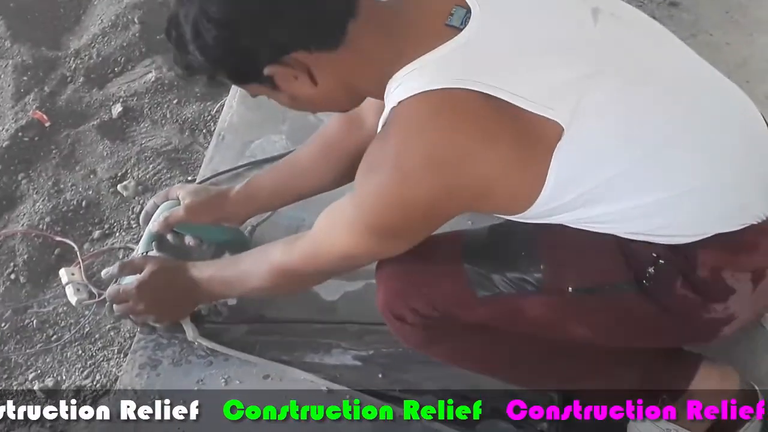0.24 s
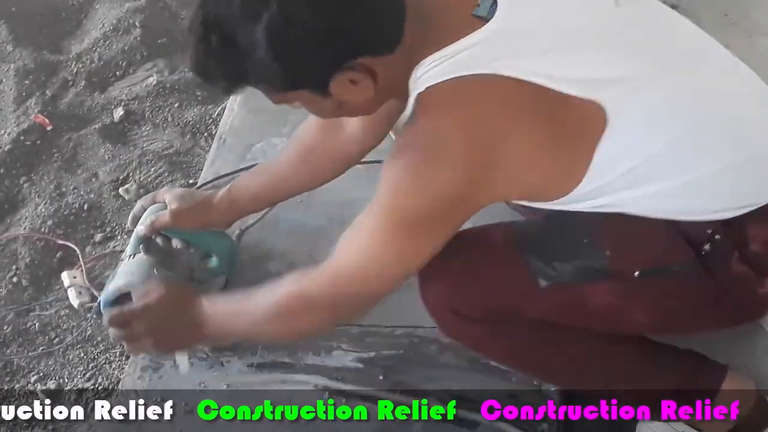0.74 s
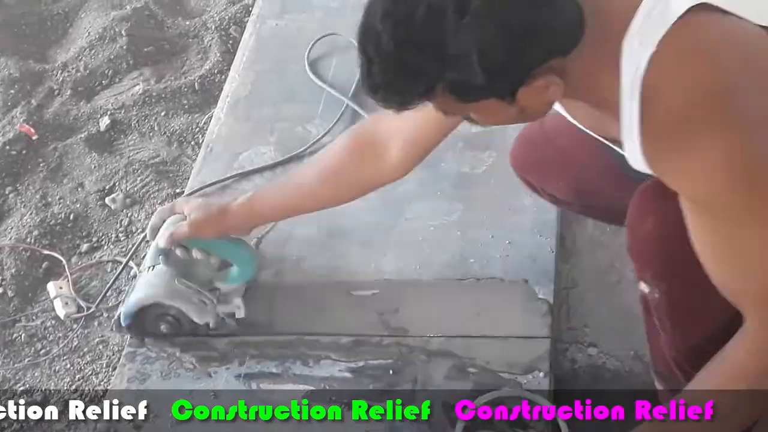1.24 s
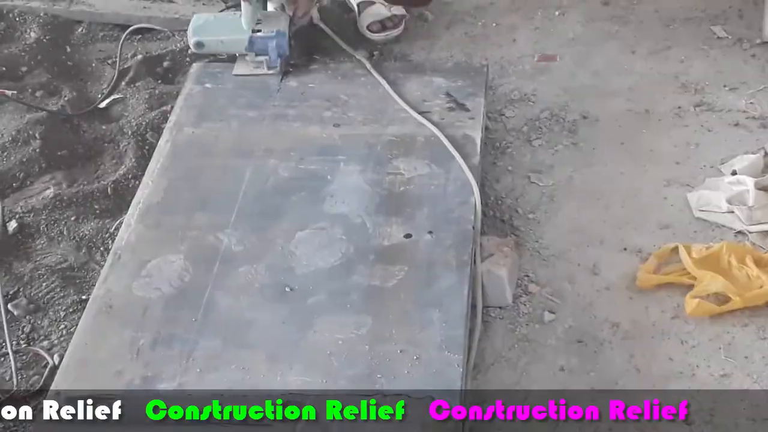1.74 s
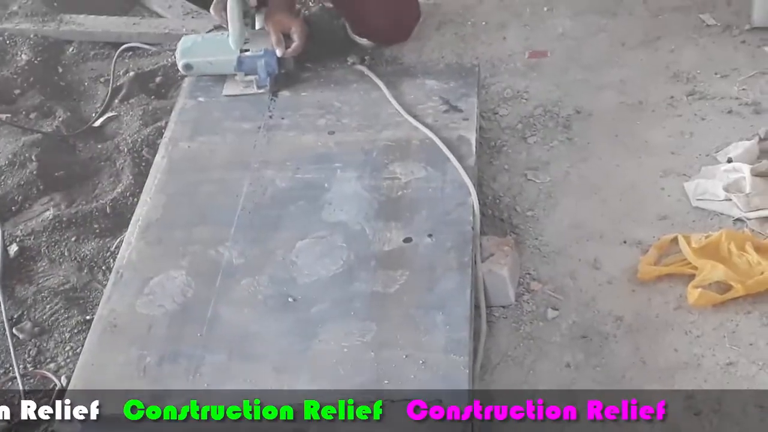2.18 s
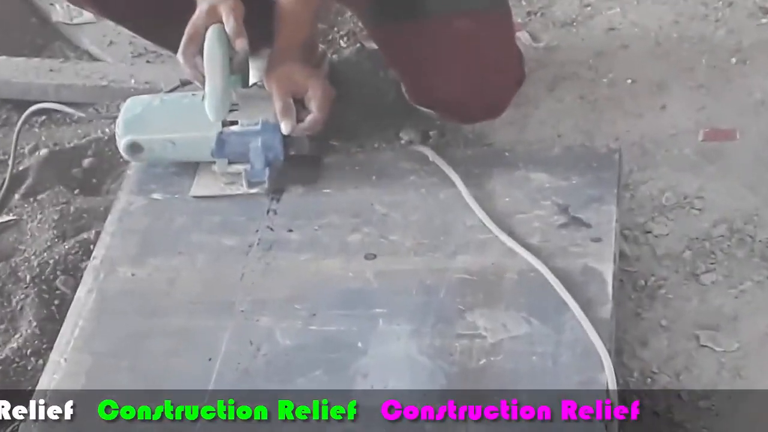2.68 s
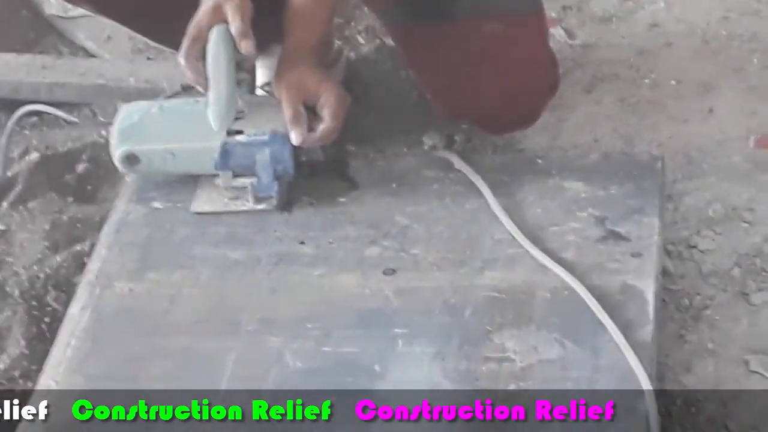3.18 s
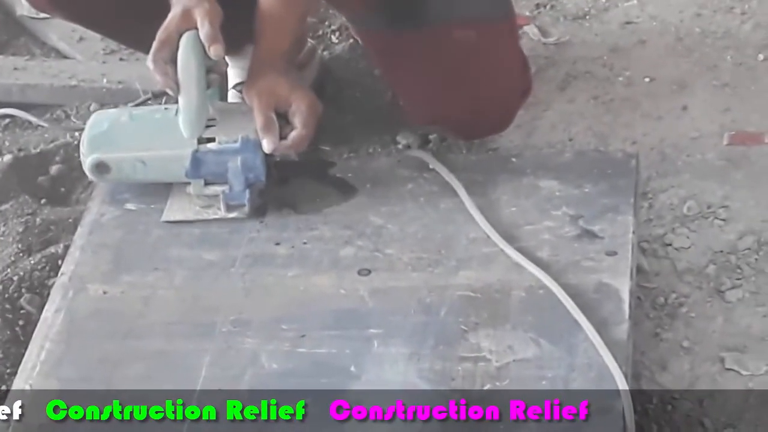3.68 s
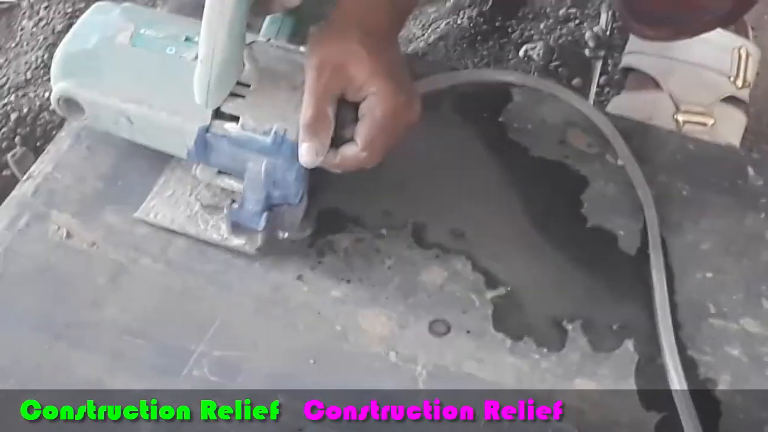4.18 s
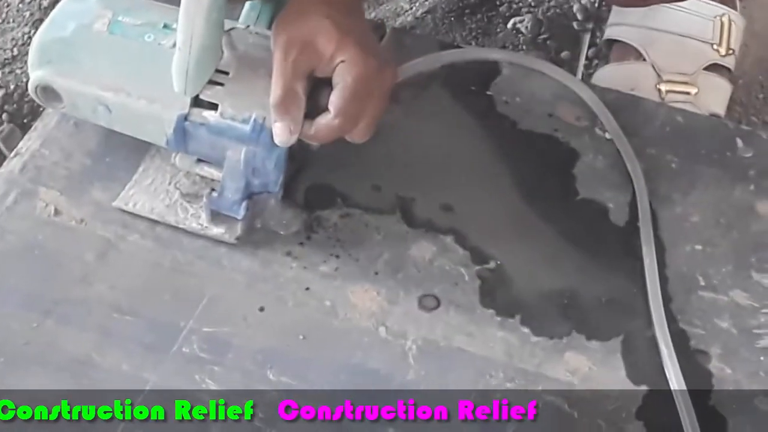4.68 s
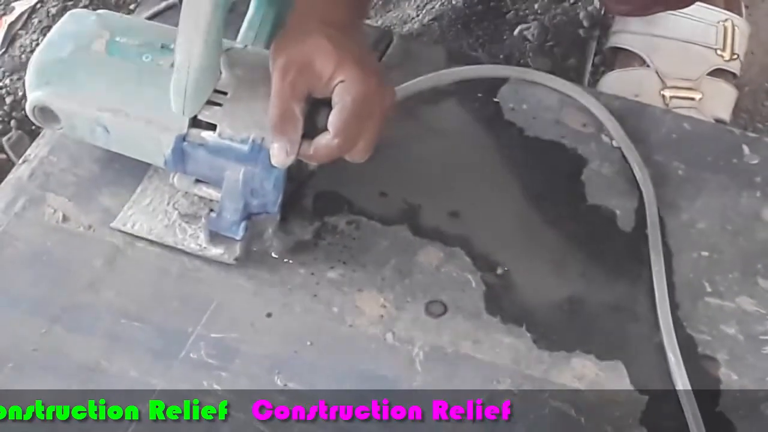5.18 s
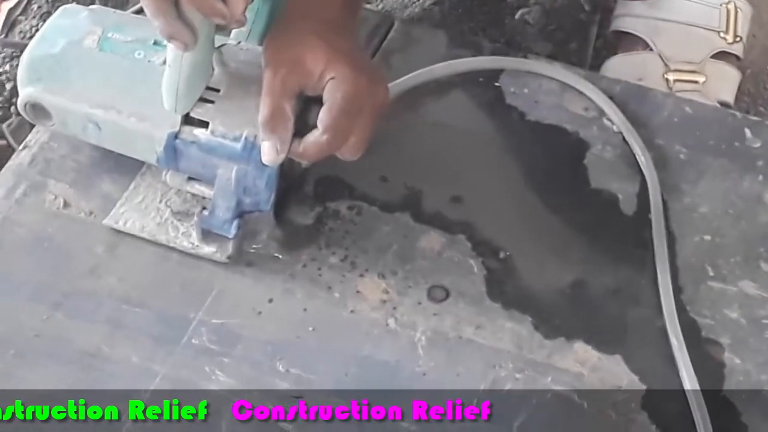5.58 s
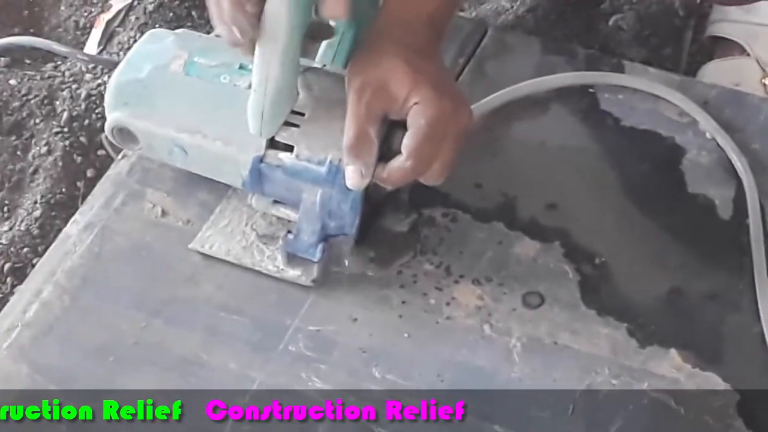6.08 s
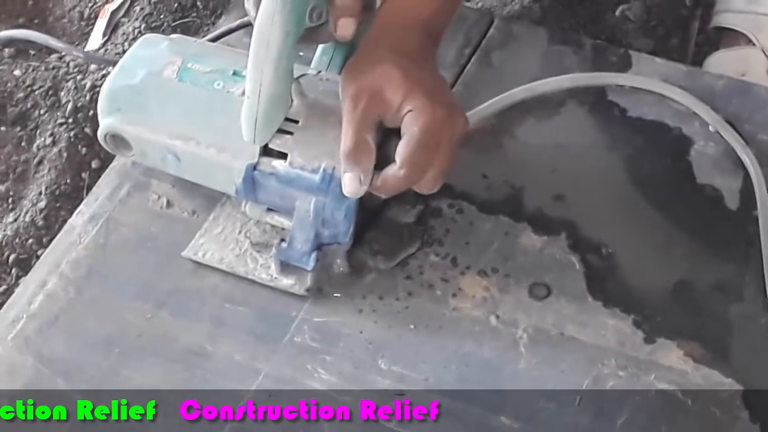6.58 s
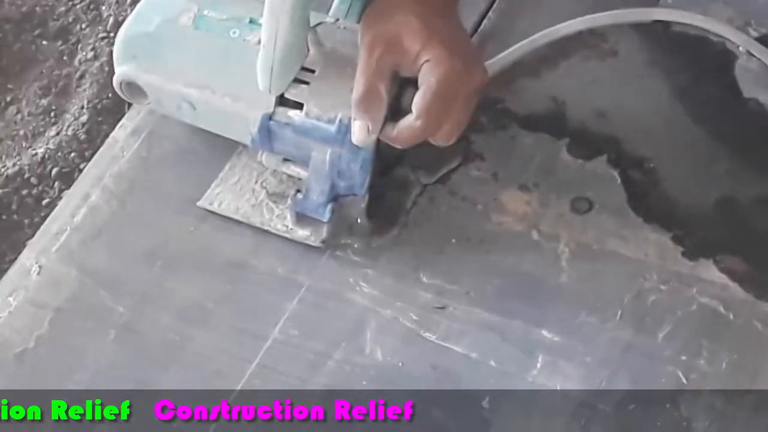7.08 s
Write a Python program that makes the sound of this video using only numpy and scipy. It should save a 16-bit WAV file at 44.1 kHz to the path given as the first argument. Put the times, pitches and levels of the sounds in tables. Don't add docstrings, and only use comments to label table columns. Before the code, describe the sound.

A hand-held electric cutter grinds stone throughout, close and dry, with faint low site rumble beneath. From 0 to 1 s the motor buzz begins laboured and climbs steadily, under a piercing very high screech, blade ring and dense crackling chips, thinning after 0.55 s. At 1.03 s the sound jumps to a steadier fast cut with scattered chip snaps; around 1.5 s the screech dips sharply. At 1.6 s it returns brighter and bogs down in pitch. At 1.9 s it drops to a long loaded cut, humming and singing, with a quick upward flutter near 2.25 s. Crackle returns from 3.55 to 4.1 s. At 4.15 s the closest view brings an abrupt, fuller, steady roar of pouring grit over the housing noise, the screech softer, with slight pitch wavering near 6.2 s and a sag near 7 s, still running at the end, 7.3 s.

```python
import sys
import numpy as np
from scipy import signal
from scipy.fft import rfft, irfft, next_fast_len
from scipy.io import wavfile
from scipy.ndimage import uniform_filter1d

SR = 44100
rng = np.random.default_rng(int(sys.argv[2]) if len(sys.argv) > 2 else 0)


def nominal_scale(level):
    x = np.asarray(level, float) / 20
    return 10 ** x


def file_out(sig):
    cols = np.atleast_2d(sig).T
    lim = np.clip(cols, -1, 1)
    pcm = np.round(lim * 32767).astype(np.int16)
    wavfile.write(sys.argv[1], SR, pcm)


N = 323694

# time_s, strike_rate_hz
STRIKE_RATE = [
    [(0, 535), (.15, 529), (.3, 550), (.42, 581), (.6, 655), (.78, 702), (.9, 724), (.97, 729), (1.02, 745)],
    [(1.03, 708), (1.2, 732), (1.3, 723), (1.43, 720), (1.55, 722)],
    [(1.56, 788), (1.65, 760), (1.78, 716), (1.895, 630)],
    [(1.9, 483), (2.43, 482.5), (2.55, 490.5), (2.76, 488), (2.87, 477.5), (3.41, 481), (3.55, 471),
     (3.99, 472), (4.13, 461)],
    [(4.15, 488.5), (4.3, 492.3), (5.4, 492), (5.7, 484), (6.35, 484.5), (6.52, 487), (6.78, 479),
     (6.98, 466.5), (7.34, 478)],
]
# peak_s, rise_hz, fall_s
EASES = [
    (1.9, 7, .14),
    (2.24, 39, .125),
    (3.91, 10, .12),
    (6.17, 17, .15),
]
RISE_TO_FALL = .8
# time_s, clarity_db
CLARITY = [(0, -2), (.5, -6), (.8, -2), (1.5, -7), (1.89, -4), (1.9, 0), (2.15, 0), (2.26, -4), (2.5, -1),
           (4.13, -2), (4.15, -6), (4.6, -9), (5.3, -10), (5.5, -5), (7.05, -4), (7.34, -7)]
# start_s, screech_db, ring_db, housing_db, housing_drift_db_per_s
SHOTS = [
    (0, -20.5, -29.5, -30.5, -5),
    (1.025, -20, -30, -36, 2),
    (1.575, -18.5, -25, -32, -5),
    (1.9, -22.5, -25, -35, -0.4),
    (4.14, -29, -25.5, -28.5, 1.4),
]
# time_s, pressure_db, blade_depth_db
HAND = [(0, .5, 2), (.5, 0, -1.5), (.78, 1, 0), (1.0, -0.5, -1.5), (1.3, 0.5, 3.5), (1.43, -1, -1),
        (1.5, -14, 2), (1.56, -7, 0.1), (1.59, -2, -1.5), (1.92, 2, -4), (2.22, 1.5, 0.8), (3.12, 1, 1.5),
        (4.1, 2.5, 0), (4.55, 3.5, -1), (5.0, 2, -3), (6.3, 2.2, 0.5), (7.0, -0.5, -1.5), (7.33, 4, -1)]
RING_SHARE, HOUSING_SHARE = 0.12, 0.2
# peak_s, change_db, half_length_s
BITES = [
    (3.0, -2, 0.11),
    (3.4, 3, 0.24),
    (4.4, -4, .15),
    (5.08, 1.5, .08),
    (5.87, 3, 0.073),
    (7.24, -9, 0.15),
]
# start_s, end_s, change_db
LIFT = [
    2.17,
    2.31,
    -3.5,
]
# start_s, end_s, multiple, level_db
HUM = [(.67, .98, 5, -47), (.77, .98, 9, -43), (1.57, 1.66, 4, -41), (1.64, 1.82, 5, -41.5),
       (1.88, 2.22, 2, -40), (2.17, 2.32, 2, -47.5), (2.28, 3.75, 2, -40.5), (3.72, 4.15, 2, -44),
       (1.9, 2.0, 9, -47), (1.88, 3.0, 6, -45.5), (2.07, 2.58, 4, -48.5), (1.95, 2.2, 15, -45),
       (2.3, 2.83, 15, -43), (2.48, 3.35, 4.62, -50), (2.75, 3.5, 8, -53), (2.95, 3.9, 9, -51),
       (2.77, 4.15, 4, -47.5)]
# start_s, end_s, multiple, level_db
SING = [(0, .2, 20, -35), (.07, .38, 19, -37), (0, .38, 25, -33), (.1, .45, 18, -39), (.82, 1.13, 20, -30),
        (.87, 1.03, 21, -32), (.87, 1.18, 18, -33), (1.9, 2.13, 28, -31), (1.9, 2.18, 27, -32),
        (2.27, 2.85, 20, -38), (3.05, 3.48, 20, -39), (2.32, 3.43, 21, -33), (2.37, 2.83, 26, -36),
        (2.47, 3.13, 29, -33), (2.47, 4.13, 18, -37), (2.57, 3.58, 19, -36), (2.62, 3.33, 31, -36),
        (2.67, 3.13, 27, -35), (2.87, 3.28, 25, -36), (3.57, 4.08, 27, -34), (4.15, 4.42, 21, -34.5),
        (5.42, 5.68, 19, -35), (5.25, 6.3, 21, -33), (6.3, 6.7, 21, -36), (4.15, 6.8, 28, -36),
        (6.85, 7.33, 29, -35), (6.3, 6.85, 31, -36), (6.85, 7.1, 23, -36), (6.45, 7.0, 22, -36),
        (6.8, 7.08, 24, -35)]
# pitch_hz, level_db (per Hz)
SCREECH_COLOUR = [(10500, -30), (11700, -15), (12400, -9), (13100, -3), (13400, -5), (14150, 0),
                  (14600, -2.5), (14850, -6), (15100, -4.5), (15600, -8), (16000, -9)]
# pitch_hz, level_db (per Hz)
RING_COLOUR = [(7000, -28), (8200, -9), (8900, -2), (10000, 0), (11100, -1), (12300, -2), (13500, -20)]
# pitch_hz, level_db (per Hz)
HOUSING_COLOUR = [(20, -29), (100, -23), (200, -16.5), (500, -11), (1000, -10.5), (2200, -11),
                  (5400, -10.5), (7300, -7.5), (8600, -13.5), (10500, -12)]
# pitch_hz, level_db (per Hz)
SITE_COLOUR = [(15, -5), (30, -2), (100, -4.5), (200, -12.5), (400, -29)]
# start_s, end_s, level_db
SPELLS = [(-.02, 0.236, -27.5), (.25, 0.274, -29), (0.28, 0.36, -26), (0.358, 0.53, -30),
          (0.55, 0.574, -35.5), (.58, 1.057, -42.5), (1.19, 1.322, -31), (3.546, 3.8, -40.5),
          (3.793, 3.817, -28.5), (3.84, 4.145, -32.5), (3.888, 3.898, -31), (3.942, 3.967, -30)]
# peak_s, level_db, length_ms
BURSTS = [(0.014, -33, 12), (0.036, -28, 9.9), (0.198, -31, 17), (0.306, -37, 7), (0.389, -25, 27),
          (0.414, -29, 7.5), (0.474, -22.5, 12), (0.496, -26.5, 17), (0.542, -27, 10.4), (0.594, -32.5, 19),
          (0.676, -28.5, 11), (0.822, -36, 8), (0.858, -30.5, 15), (0.926, -31, 10), (1.015, -24, 16.5),
          (1.21, -38, 5.8), (1.28, -28, 7), (1.318, -28.5, 11), (1.37, -26.5, 9.7), (1.417, -35.5, 9),
          (1.868, -29, 8.4), (1.885, -30, 15), (2.552, -28.5, 6.5), (3.65, -33.5, 17), (3.717, -37, 8),
          (3.764, -33.5, 13), (3.828, -27.5, 9.1), (4.008, -28, 10), (4.052, -29, 16), (4.096, -27.5, 6)]
# pitch_hz, level_db (per Hz)
STONE_COLOUR = [(60, -55), (120, -20), (220, -11.5), (350, -3.5), (580, -1), (1100, -4), (2200, -8),
                (4400, -13), (9000, -15), (12000, -50)]
# centre_s, centre_hz
SPLITS = [(0.629, 8960), (0.655, 13820), (1.814, 12600), (1.931, 7570), (2.0, 6330), (2.072, 15040),
          (2.162, 5160), (2.303, 4900), (2.837, 12440), (2.906, 11710), (2.908, 6930), (3.253, 13000),
          (3.418, 10330), (3.488, 6070), (3.511, 11710), (3.626, 4700), (3.629, 10330), (3.67, 14470),
          (3.741, 7620), (4.205, 4750), (4.207, 6930), (5.531, 8300), (5.739, 6290), (6.178, 8220),
          (6.341, 4750), (6.341, 6500), (6.341, 8250), (7.061, 5800), (7.156, 5800), (7.156, 11020)]
# time_s, level_db
POUR = [(4.14, -21), (4.16, -20), (4.5, -20), (5.0, -20), (7.34, -20.5)]
# pitch_hz, level_db (per Hz)
GRIT_COLOUR = [(60, -60), (120, -42), (250, -16), (420, -4.5), (980, -1), (2000, -1.5), (3600, -4),
               (6000, -6.5), (9000, -11), (13000, -21)]


def colour(x, table):
    size = next_fast_len(N)
    hz, db = np.transpose(table)
    bin_hz = np.arange(size // 2 + 1) * SR / size
    gain = nominal_scale(np.interp(np.log(bin_hz + 1), np.log(hz), db))
    y = irfft(rfft(x, size) * gain, size)[:N]
    return y / np.sqrt(np.mean(y ** 2))


def curves(tables):
    s, *columns = np.transpose(np.vstack(tables))
    return [np.interp(np.arange(N) / SR, s, column) for column in columns]


def walk(rate):
    hold = int(SR / rate)
    levels = np.repeat(rng.standard_normal(N // hold + 1), hold)
    return 1.4 * uniform_filter1d(levels, hold)[:N]


def bumps(events, quicker=1):
    t = np.arange(N) / SR
    total = np.zeros(N)
    for s, size, fall_s in events:
        away_s = np.maximum(t - s, (s - t) / quicker)
        total += size * np.clip(1 - away_s / fall_s, 0, 1)
    return total


def strike_rate():
    return curves(STRIKE_RATE)[0] + bumps(EASES, RISE_TO_FALL)


def strikes(hz, turn, patchy_db, count=32):
    comb = np.zeros(N)
    for k in range(3, count + 1):
        wobble = .04 * k * walk(60)
        in_range = k * hz < .36 * SR
        swell = nominal_scale(patchy_db * walk(16))
        comb += in_range * swell * np.sin(k * turn + wobble + 7 * rng.random())
    return comb / np.sqrt(count / 2)


def blend(hiss, comb, clear_db):
    return (hiss + nominal_scale(clear_db) * comb) / np.sqrt(1 + nominal_scale(2 * clear_db))


def blade_levels():
    t = np.arange(N) / SR
    shots = np.transpose(SHOTS)
    current = np.maximum(np.searchsorted(shots[0], t, "right") - 1, 0)
    start, screech_db, ring_db, housing_db, drift = shots[:, current]
    pressure_db, depth_db = curves([HAND])
    screech_db = screech_db + pressure_db
    ring_db = ring_db + RING_SHARE * pressure_db + depth_db
    housing_db = housing_db + HOUSING_SHARE * pressure_db + drift * (t - start) + bumps(BITES)
    return screech_db, ring_db, housing_db


def singing(turn):
    t, out = np.arange(N) / SR, np.zeros(N)
    for start, end, multiple, db in [*HUM, *SING]:
        a, b = int(start * SR), int(end * SR)
        fade = np.clip(np.minimum(t[a:b] - start, end - t[a:b]) / .03, 0, 1)
        tremble = nominal_scale(db + 3 + (1.5 + .05 * multiple) * walk(22)[a:b])
        wobble = .04 * multiple * walk(60)[a:b]
        out[a:b] += fade * tremble * np.sin(multiple * turn[a:b] + wobble)
    return out


def blade():
    hz = strike_rate()
    turn = 2 * np.pi * np.cumsum(hz) / SR
    screech_db, ring_db, housing_db = blade_levels()
    clear_db, = curves([CLARITY])
    hiss = rng.standard_normal(N)
    comb = strikes(hz, turn, patchy_db=2.2)
    high = blend(hiss, comb, clear_db - 2.5)
    low = blend(hiss, comb, clear_db - 7)
    judder = 0.27 * walk(32)
    screech = nominal_scale(screech_db + judder + 1.0 * walk(45)) * colour(high, SCREECH_COLOUR)
    ring = nominal_scale(ring_db - 4.0 + judder + 1.3 * walk(40)) * colour(high, RING_COLOUR)
    housing = nominal_scale(housing_db + 1.5 + judder + 0.62 * walk(18)) * colour(low, HOUSING_COLOUR)
    start, end, db = LIFT
    lift_db = np.interp(np.arange(N) / SR, [start - .02, start, end, end + .02], [0, db, db, 0])
    return screech + ring + housing + nominal_scale(lift_db) * singing(turn)


def site_rumble():
    return nominal_scale(-54.5) * colour(rng.standard_normal(N), SITE_COLOUR)


def crackle_db():
    t = np.arange(N) / SR
    edge_s, trickle_db = .014, -58
    power = np.full(N, nominal_scale(2 * trickle_db))
    for start, end, db in SPELLS:
        gate = np.clip(np.minimum(t - start, end - t) / edge_s + .5, 0, 1)
        power += nominal_scale(2 * db) * gate ** 2
    return 10 * np.log10(power)


def clicks(rate_hz, spread_db):
    size = nominal_scale(np.clip(spread_db, 0, 6) * np.minimum(rng.exponential(size=N), 3))
    return (rng.random(N) < rate_hz / SR) * size * rng.uniform(-0.95, 1, N)


def chips():
    t = np.arange(N) / SR
    crack_db = 20.5
    power = nominal_scale(2 * (crackle_db() + 0.56 * walk(90)))
    breaks = clicks(rate_hz=1000, spread_db=2.9)
    breaks /= np.std(breaks)
    for s, db, ms in BURSTS:
        power += nominal_scale(2 * db) * np.exp(-.5 * ((t - s) / (ms / 2400)) ** 2)
        breaks[int(s * SR)] = nominal_scale(crack_db) * rng.choice([-1, 1])
    return nominal_scale(2.0) * np.sqrt(power) * colour(breaks, STONE_COLOUR)


def splits(sound):
    length_s, width_hz, level_db = 0.038, 1260, -3.5
    out, size = np.zeros(N), int(length_s * SR)
    hz = np.arange(size // 2 + 1) * SR / size
    fade = signal.windows.tukey(size, .6)
    for s, centre_hz in SPLITS:
        a = int(s * SR) - size // 2
        band = abs(hz - centre_hz) < width_hz / 2
        own = irfft(rfft(sound[a:a + size]) * band, size)
        hiss = irfft(rfft(rng.standard_normal(size)) * band, size)
        out[a:a + size] += nominal_scale(level_db) * np.std(own) * hiss / np.std(hiss) * fade
    return out * np.array([[1], [-1]])


def grit():
    on = np.arange(N) / SR > POUR[0][0]
    level_db = curves([POUR])[0] + .45 * walk(40)
    return on * nominal_scale(level_db) * colour(clicks(rate_hz=9000, spread_db=1.9), GRIT_COLOUR)


def scene():
    return np.tile(blade() + site_rumble() + chips() + grit(), (2, 1))


def band_limit(x):
    return signal.sosfilt(signal.butter(12, 16990, fs=SR, output="sos"), x)


def record(dry):
    size = next_fast_len(N)
    passes = np.arange(size // 2 + 1) * SR / size < 15670
    rounded = .8 * np.tanh(dry / .8) + splits(dry[0])
    mix = irfft(rfft(rounded, size) * passes, size)[:, :N]
    return band_limit(mix)


dry = scene()
out = record(dry)
file_out(out)
```